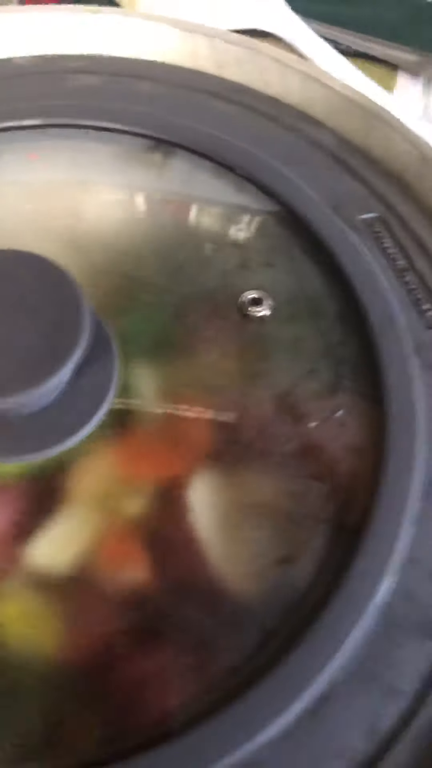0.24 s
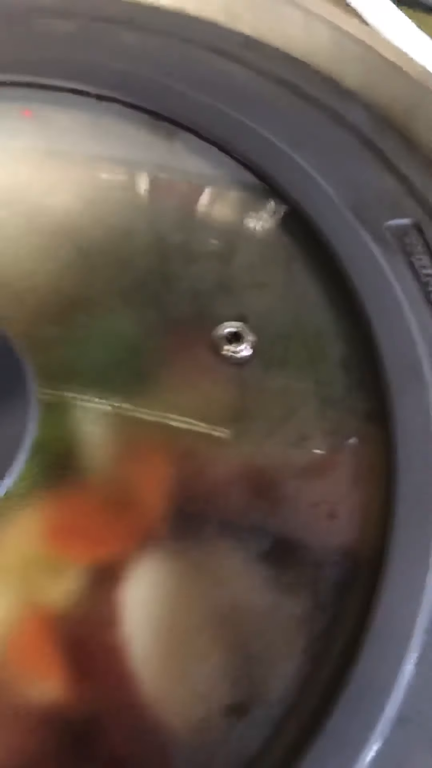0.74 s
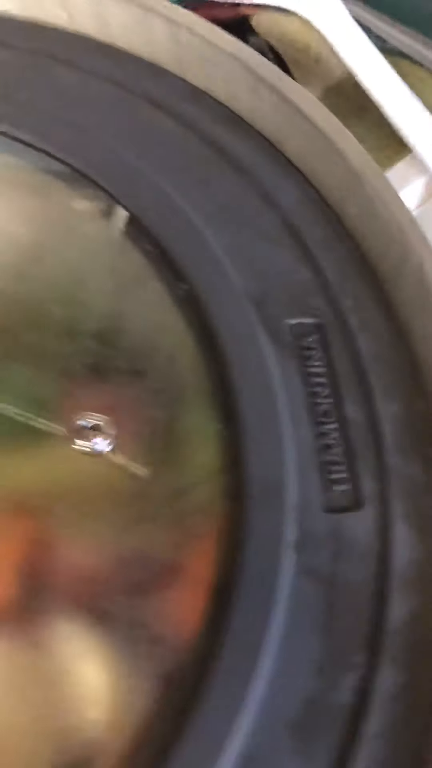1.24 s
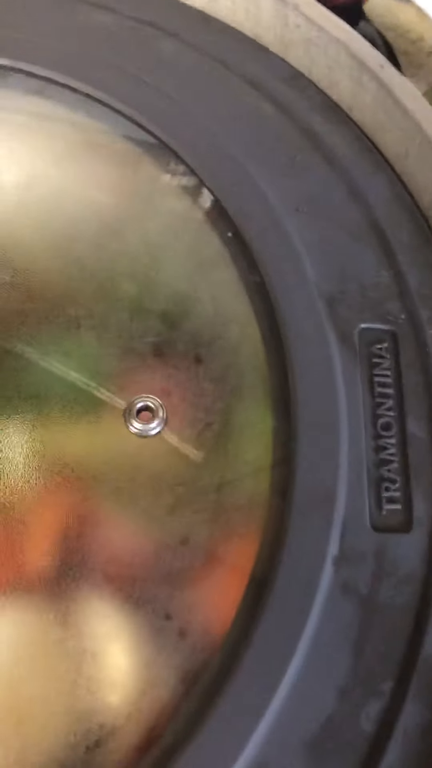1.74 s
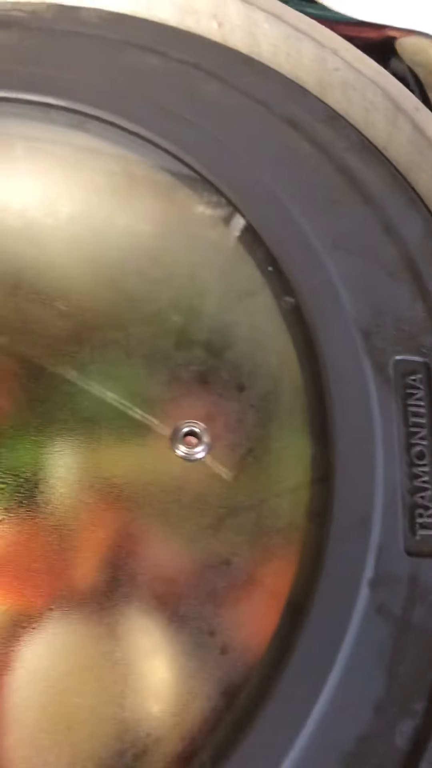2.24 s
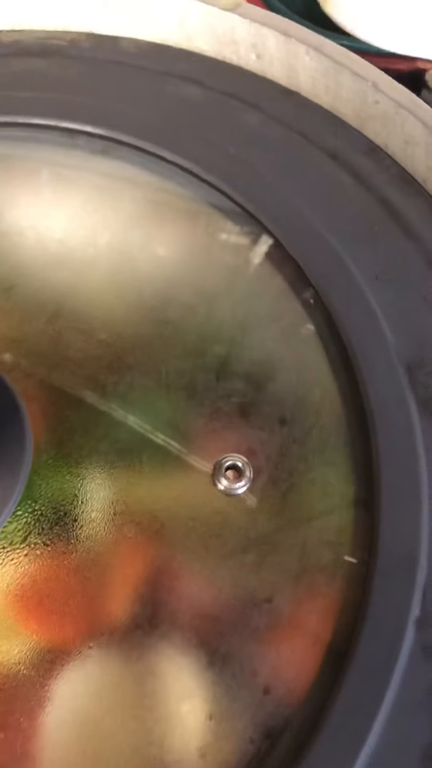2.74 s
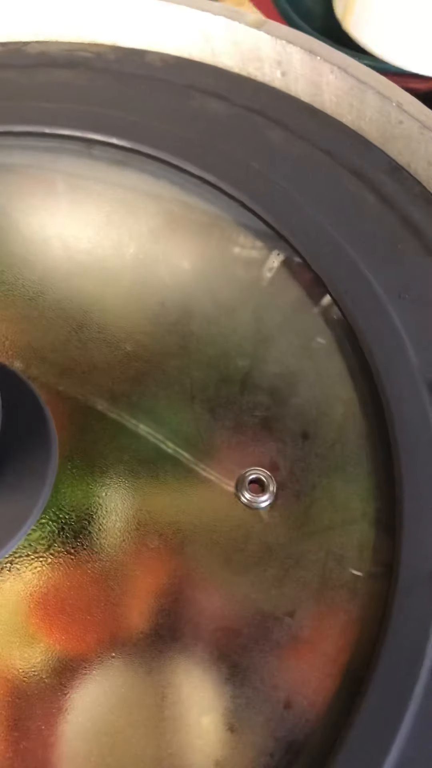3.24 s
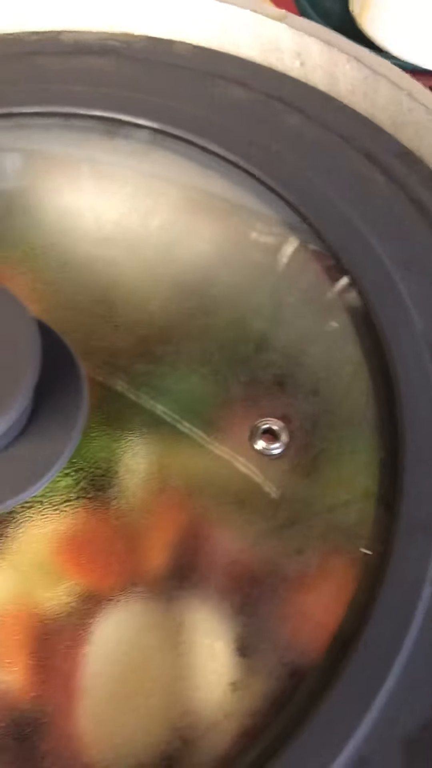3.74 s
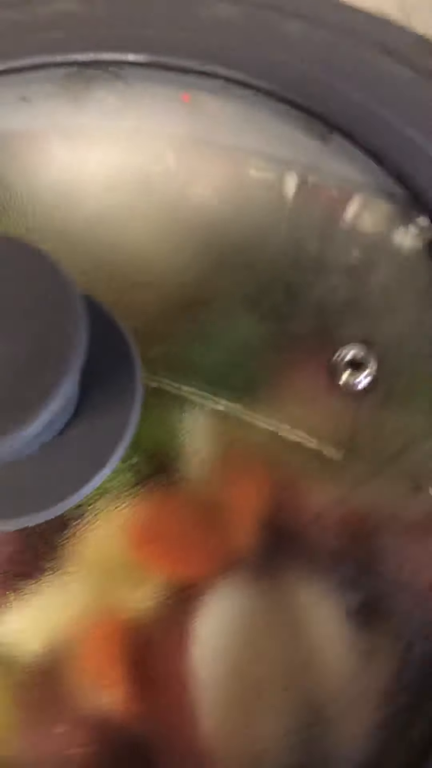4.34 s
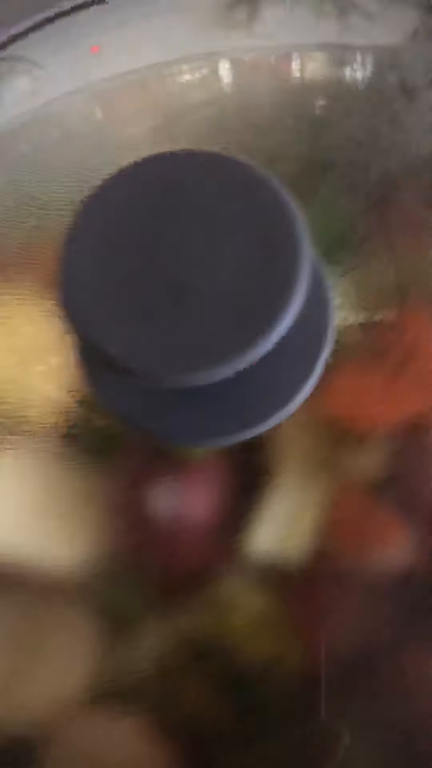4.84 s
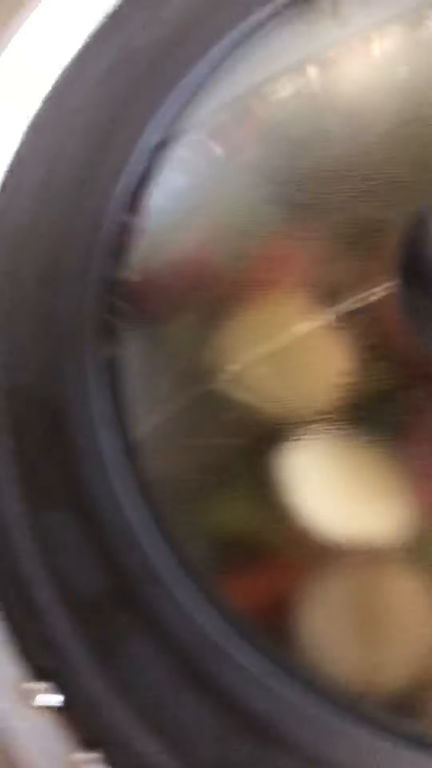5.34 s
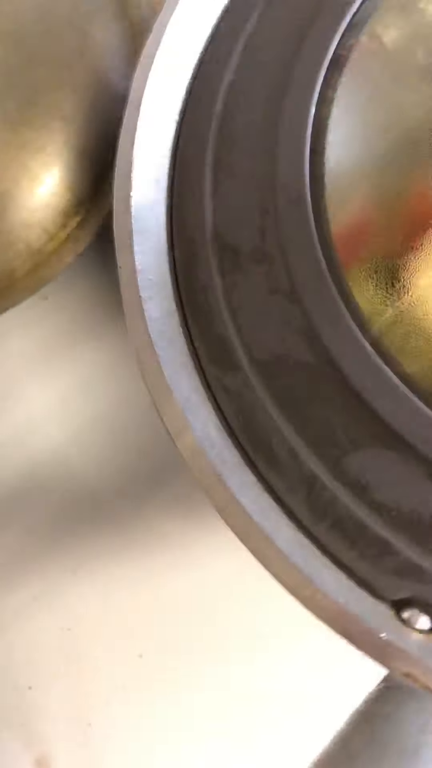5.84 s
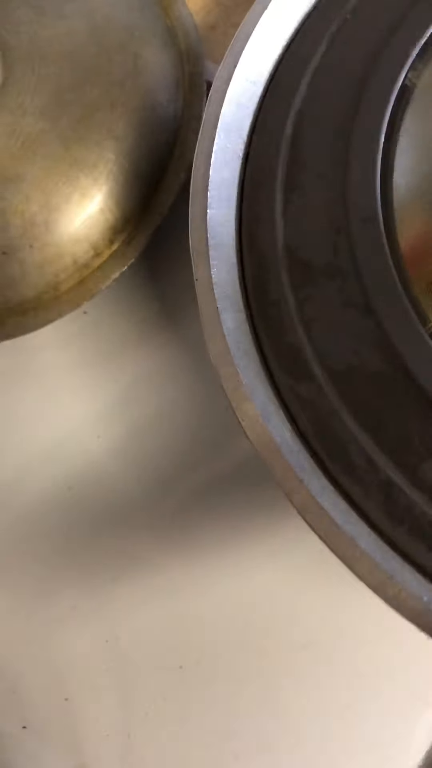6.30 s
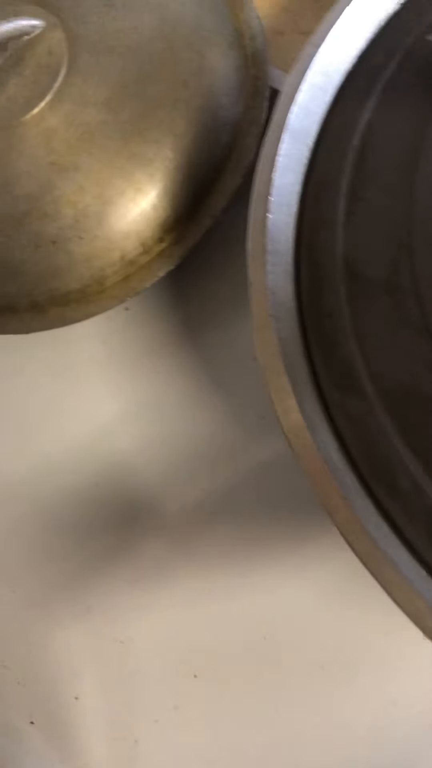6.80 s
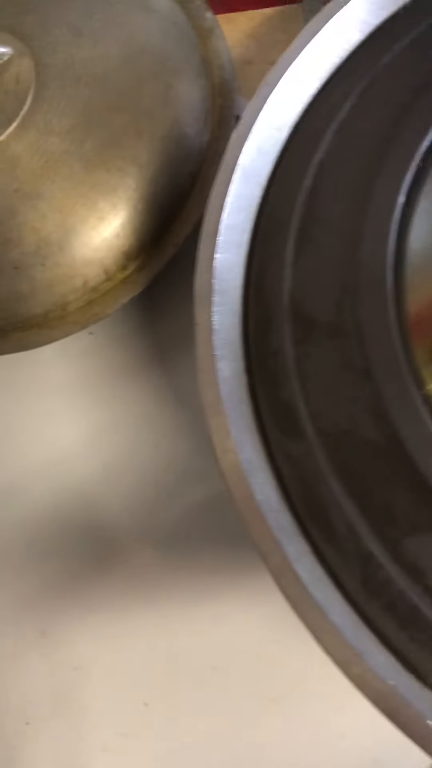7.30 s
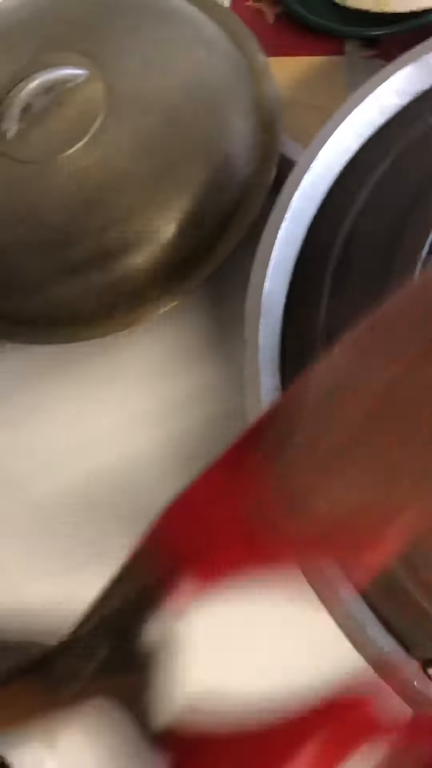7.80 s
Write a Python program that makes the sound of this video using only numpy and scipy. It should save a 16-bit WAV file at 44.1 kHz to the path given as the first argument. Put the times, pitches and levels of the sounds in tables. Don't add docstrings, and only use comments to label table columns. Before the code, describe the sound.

Dense, fine sizzle and steam hiss fill the foreground over a faint low flame rumble. Footfall-like bumps, muffled wood knocks, a scrape and light pot taps come irregularly nearby. A single hard clack jumps out just before halfway, ringing briefly in the small room. Afterwards there are a few tiny sharp spits and a couple more bumps, then the hiss thins and softens beside the pot, with its treble briefly shaded at the end.

```python
import sys
import numpy as np
from scipy import signal
from scipy.fft import rfft, irfft
from scipy.io import wavfile

SR = 44100
rng = np.random.default_rng(int(sys.argv[2]) if len(sys.argv) > 2 else 0)


def nominal_scale(level):
    x = np.asarray(level, float) / 20
    return 10 ** x


def persist_wave(psi):
    counts = np.round(np.clip(psi, -1, 1) * 32767).astype(np.int16)
    wavfile.write(sys.argv[1], SR, np.atleast_2d(counts).T)


N = 355446
T = np.arange(N) / SR
FFT_SIZE = 360000
HZ = np.maximum(np.fft.rfftfreq(FFT_SIZE, 1 / SR), 1)


def rms_one(x):
    return x / np.sqrt(np.mean(x ** 2) + 1e-20)


def noise_spectrum():
    return rfft(rng.standard_normal(N), FFT_SIZE)


def at_hz(points, hz):
    table_hz, values = np.transpose(points)
    return np.interp(np.log(hz), np.log(table_hz), values)


def drift(rate_hz):
    hop = 40
    pole = np.exp(-2 * hop * np.pi * rate_hz / SR)
    chance = rng.standard_normal(N // hop + 2002)
    slow = signal.lfilter([1], [1, -2 * pole, pole ** 2], chance)[2000:]
    return np.interp(np.arange(N) / hop, np.arange(len(slow)), rms_one(slow))


def ring(clicks, hz, t60):
    pole = nominal_scale(-60 / (max(t60, .001) * SR))
    angle = 2 * np.pi * hz / SR
    return signal.lfilter([0, np.sin(angle)], [1, -2 * pole * np.cos(angle), pole ** 2], clicks + 1e-18)


def add(track, s, sound):
    i = round(s * SR)
    track[i:i + len(sound)] += sound[:N - i]


def colour(spectrum, modes=()):
    db = at_hz(spectrum, HZ)
    for hz, width, boost in modes:
        db = db + boost / (1 + (2 * (HZ - hz) / width) ** 2)
    return nominal_scale(db)


def band(hz, octaves):
    return np.cos(np.pi / 2 * np.clip(np.log2(HZ / hz) / octaves, -1, 1)) ** 2


def comb(echoes):
    return 1 + sum(gain * np.exp(-2j * np.pi * HZ * delay) for delay, gain in echoes)


def parts(events, shape):
    rows = []
    for s, db, hz, t60 in events:
        for ratio, part_db, longer in shape:
            rows.append((s, db + part_db, hz * ratio, t60 * longer))
    return rows


def blows(table, contact_cycles):
    out, t = np.zeros(N), T[:SR // 2]
    for s, db, hz, t60 in table:
        push = (t < contact_cycles / hz) * np.sin(np.pi * t * hz / contact_cycles)
        add(out, s, nominal_scale(db) * ring(push / push.sum(), hz, t60))
    return out


def soft_blows(rows):
    out, t = np.zeros(N), T[:SR // 2]
    rise_cycles = 0.92
    for s, db, hz, t60 in rows:
        swell = 1 - np.exp(-t * hz / rise_cycles)
        add(out, s, nominal_scale(db - 60 * t / t60) * swell * np.sin(2 * np.pi * hz * t))
    return out


def resonant_swells(rows):
    out = np.zeros(N)
    for s, length, db, hz, width_hz in rows:
        t = T[T < length]
        t60 = np.log(1000) / (np.pi * 1.5 * width_hz)
        once = ring(rng.standard_normal(2 * SR), hz, t60)
        tone = ring(once, hz, t60)[-len(t):]
        add(out, s, nominal_scale(db) * rms_one(tone) * np.sin(np.pi * t / length))
    return out


def through_modes(spans, modes):
    return resonant_swells([(s, length, db + mode_db, hz, width)
                            for s, length, db in spans for hz, width, mode_db in modes])


# f/Hz, density level/dB
FLAME_SPECTRUM = [(35, -28), (60, -6), (82, -18), (105, -6.5), (120, -1), (150, -2), (200, -4), (290, -4.5),
                  (380, -12.5), (500, -12)]
# f/Hz, rms level/dB
HUM = [(59.2, -65)]


def burner():
    flame = noise_spectrum() * colour(FLAME_SPECTRUM) * (HZ < 500) * (HZ > 35)
    noise = rms_one(irfft(flame)[:N])
    hum = sum(np.sqrt(2) * nominal_scale(db) * np.sin(2 * np.pi * hz * T) for hz, db in HUM)
    level_db = -46.5 - 0.74 * T
    return nominal_scale(level_db + .8 * drift(6)) * noise + hum


# t/s, peak level/dB, f/Hz
THUDS = [(.485, -30.5, 139), (.87, -32.5, 118), (0.973, -30, 124), (1.03, -40, 85), (1.379, -37, 183),
         (1.46, -30.5, 119), (1.63, -34, 132), (2.258, -26.5, 113), (2.36, -27, 122), (3.56, -37, 75),
         (3.745, -35, 130), (5.01, -33, 172), (5.122, -38, 150), (5.401, -30.5, 196.5), (5.41, -39, 79),
         (5.465, -32, 141), (5.47, -36, 70)]


def thuds():
    ring_cycles = 15.7
    return soft_blows([(s, db + 3.0, hz, ring_cycles / hz) for s, db, hz in THUDS])


# t/s, peak level/dB, f/Hz, T60/s
KNOCKS = [(.43, -25, 290, 0.018), (.965, -33, 444, 0.075), (1.44, -33, 466, .04), (1.57, -42, 530, .06),
          (1.615, -37, 395, 0.087), (1.737, -18, 490, .018), (2.11, -41, 413, .06),
          (2.238, -23.5, 327, 0.056), (2.262, -33, 400, .07), (2.308, -25, 382, 0.037),
          (2.33, -35.5, 520, 0.071), (2.99, -40, 480, 0.051), (3.39, -35, 305, .022),
          (3.529, -30, 363, .041), (4.996, -29, 600, .045), (4.996, -31, 270, .05)]
# frequency ratio/1, level/dB, decay ratio/1
WOOD = [(1.013, 1, 0.84), (1.52, -8.5, .9), (.56, -9.5, 2.5)]


def knocks():
    return soft_blows(parts([(s, db + 4.0, hz, t60) for s, db, hz, t60 in KNOCKS], WOOD))


# t/s, peak level/dB, f/Hz
TAPS = [
    (1.927, -34, 890),
    (2.381, -30.5, 920),
    (3.535, -34.5, 923),
    (3.7, -37.5, 960),
]
# frequency ratio/1, level/dB, decay ratio/1
VESSEL = [(1, 1, 1), (1.07, -4, .8), (0.495, -6, .8)]


def taps():
    bounce_s, bounce_db, t60 = .016, 2.5, .045
    touches = [(s + k * bounce_s, db + k * bounce_db, hz, t60) for s, db, hz in TAPS for k in range(2)]
    return soft_blows(parts(touches, VESSEL))


# t/s, peak level/dB, f/Hz
SNAPS = [
    (1.737, -31, 2360),
    (3.39, -25, 1980),
]
# frequency ratio/1, level/dB, decay ratio/1
SNAP_MODES = [(0.95, -0.5, 1), (.71, -1, .9), (.36, -10, 1.2)]


def snaps():
    t60 = .015
    return blows(parts([(*snap, t60) for snap in SNAPS], SNAP_MODES), contact_cycles=0.24)


# t/s, length/s, level/dB
SCRAPE = (.488, .075, -40)
# f/Hz, width/Hz, level/dB
SCRAPED = [(543, 190, -4), (1480, 170, 2.5), (1950, 450, -9), (3560, 110, -4)]


def scrape():
    return through_modes([SCRAPE], SCRAPED)


# t/s, peak level/dB, f/Hz, T60/s
BANG = [(3.8615, -16, 2930, .01), (3.8628, -10.5, 6440, 0.0092), (3.8630, -6, 3800, 0.0053),
        (3.8638, -2, 2330, 0.0084), (3.8636, -4.5, 1116, 0.023), (3.8655, -1, 610, 0.017),
        (3.869, -21.5, 470, 0.18), (3.878, -9, 620, 0.033), (3.881, -9, 1250, 0.031),
        (3.887, -17, 1040, .11), (3.879, -17.5, 9400, 0.014), (3.89, -19.5, 131, 0.25),
        (3.88, -28, 92.5, 0.49), (3.98, -29, 59.3, 0.65)]


def bang():
    return blows(BANG, contact_cycles=0.47)


def splinter():
    rise_s, fall_s = .002, .0035
    age = np.maximum(T - BANG[0][0], 0)
    bright = signal.butter(1, [2500, 8000], "band", fs=SR, output="sos")
    noise = signal.sosfilt(bright, rng.standard_normal(N))
    return noise * np.minimum(age / rise_s, 1) ** 2 * np.exp(-np.maximum(age - rise_s, 0) / fall_s)


RATTLE_HZ = [500, 640, 1000, 1050, 1310, 2050, 2900]


def rattle():
    start_s, per_s, level_db, t60, ring_cycles = 3.884, 1500, -20, .22, 24.0
    out, t = np.zeros(N), T[:SR // 3]
    happens = rng.random(len(t)) < per_s / SR
    clicks = happens * rng.standard_normal(len(t)) * nominal_scale(-60 * t / t60)
    dealt = rng.integers(0, len(RATTLE_HZ), len(t))
    for k, hz in enumerate(RATTLE_HZ):
        add(out, start_s, ring(clicks * (dealt == k), hz, ring_cycles / hz))
    return nominal_scale(level_db) * out


# f/Hz, T60/s
WALL_T60 = [(100, 0.67), (400, 0.2), (1500, 0.22), (5000, 0.24), (12000, 0.13)]
# f/Hz, level/dB
WALL_COLOUR = [(40, -4), (120, -6), (600, 4.5), (1200, 6), (3000, 0), (8000, -8.5), (10500, -16.5),
               (13000, -30), (16000, -45)]


def kitchen(x):
    first_wall_s = .013
    white = noise_spectrum() * colour(WALL_COLOUR)
    t = T[:SR // 2]
    age = np.maximum(t - first_wall_s, 0)
    tail = np.zeros(len(t))
    for hz in 62 * 2. ** np.arange(9):
        tail += irfft(white * band(hz, 1))[:len(t)] * nominal_scale(-60 * age / at_hz(WALL_T60, hz))
    tail = tail * np.clip((t - first_wall_s) / .005, .4, 1)
    return signal.fftconvolve(x, tail / np.sqrt(np.sum(tail ** 2)))[:N]


# t/s, peak level/dB, f/Hz
SPITS = [
    (1.22, -22, 4620),
    (4.5494, -41, 3320),
    (4.679, -23, 3040),
    (4.89, -23, 3600),
    (6.539, -26, 5250),
    (7.5005, -25, 3850),
    (7.7156, -27, 3500),
]
# frequency ratio/1, level/dB
DROPLET = [(.8, -2.5), (1, 1.5), (1.3, -3)]


def spits():
    out, click = np.zeros(N), 1. * (np.arange(600) == 0)
    for s, db, hz in SPITS:
        for k, (ratio, part_db) in enumerate(DROPLET):
            sign = (-1) ** k
            add(out, s, sign * nominal_scale(db + part_db) * ring(click, hz * ratio, t60=0.0043))
    return out


# t/s, length/s, level/dB
LOUD_SPOTS = [
    (0, .8, -50),
    (4.4, 1.1, -49.5),
]
# f/Hz, width/Hz, level/dB
SPOT_MODES = [(790, 32, -2.5), (1540, 55, 0), (2025, 130, -1)]


def loud_spots():
    return through_modes(LOUD_SPOTS, SPOT_MODES)


# t/s, length/s, level/dB, f/Hz, width/Hz
JETS = [
    (.3, .78, -53, 9200, 1500),
    (2.7, 1, -47.5, 9800, 1700),
    (4.25, 1.1, -46.5, 8950, 900),
    (4.6, .9, -49, 5600, 500),
    (.42, .75, -51.5, 790, 55),
    (3.55, 0.023, -42, 3200, 421.2),
    (4.535, .03, -40, 4100, 500),
]


def jets():
    return resonant_swells(JETS)


def crackle():
    per_s, spread_db, ring_cycles = 5000, 3.0, 38
    pop_share, fizz_share = 0.12, 0.15
    sizes = nominal_scale(spread_db * np.minimum(rng.exponential(1, N), 4.5)) * rng.choice([-1, 1], N)
    pops = sizes * (rng.random(N) < per_s * nominal_scale(3.0 * drift(15)) / SR)
    dealt = rng.integers(0, 30, N)
    fizz = np.zeros(N)
    for k, hz in enumerate(np.geomspace(2400, 15500, 30)):
        bubbles = pops[::-1] * (dealt == k)
        fizz += np.sqrt(hz) * rms_one(ring(bubbles, hz, ring_cycles / hz))
    steam = np.sqrt(1 - pop_share - fizz_share) * rng.standard_normal(N)
    return np.sqrt(pop_share) * rms_one(pops) + np.sqrt(fizz_share) * rms_one(fizz) + steam


# t/s, sizzle level/dB, aim at the open steam level/dB
PATH = [(0.0, -38, -6.5), (0.3, -38, -8), (1.0, -37, -8), (1.9, -38.5, -7), (2.5, -37.5, -7.5),
        (3.8, -37.5, -8), (4.05, -38, -7), (4.5, -37, -6), (4.9, -38, -6), (5.25, -40, -2.5),
        (6.0, -41, 1.5), (6.4, -42, 2), (7.05, -43, 4), (7.5, -42, 3.5), (7.75, -42.5, 0), (8.06, -44.5, 0)]
MOVE_S = [5.35, 5.85]
CONTROL_HZ = [900, 3200, 8500, 13500]
AIM_SHARE = [0.22, 0.0019, 0.4, 0.9]
# t/s, length/s, level/dB
SHADE = (7.76, 0.24, -5.5)
# f/Hz, density level/dB
OVER_LID = [(180, -38), (300, -21), (600, -11), (1100, -5.5), (1500, -6.5), (2500, -5.5), (4000, -3),
            (5000, -4), (6200, -4), (7500, -6), (9300, -5.5), (12000, -9.5), (15500, -7.5)]
BESIDE_RIM = [(180, -40), (300, -20), (454, -9.5), (613, -4.5), (900, -7.5), (1400, -10.5), (2400, -7.5),
              (3500, -4.5), (5500, -4.5), (8000, -4.5), (11000, -3.5), (13000, -5), (15500, -3)]
# f/Hz, width/Hz, boost level/dB
LID_MODES = [(798, 62, 12), (1516, 57, 7.5), (1668, 42, 4), (2013, 190, 5), (2970, 116, 3),
             (4010, 190, 2.5), (636, 170, -2), (1090, 150, -8)]
RIM_MODES = [(798, 42, 9.5), (1251, 71, 14.5), (1750, 146, 9.5), (2253, 72, 9.5), (2660, 47, 7),
             (3280, 120, 5), (4540, 90, 3), (600, 120, -12.5)]
# delay/s, gain/1
LID_ECHOES = [(.00067, 0.046), (.0019, 0.064), (.0033, 0.12), (.0047, .1)]
RIM_ECHOES = [(.00203, 0.19), (.0037, 0.044), (.0052, .1)]


def sizzle():
    patchy_db, swell_db = 0.74, 0.43
    source = rfft(crackle(), FFT_SIZE)
    path_s, path_db, path_aim_db = np.transpose(PATH)
    sizzle_db, aim_db = np.interp(T, path_s, path_db), np.interp(T, path_s, path_aim_db)
    beside = np.interp(T, MOVE_S, [0, 1])
    shade_s, shade_length, shade_depth = SHADE
    shade_db = shade_depth * np.sin(np.pi * np.clip((T - shade_s) / shade_length, 0, 1))
    controls = sizzle_db + np.outer(AIM_SHARE, aim_db) + np.outer([0, 0.039, 0.63, 1], shade_db)
    middle = (HZ > 1500) & (HZ < 6000)
    together = drift(1.3)
    places = []
    for spectrum, modes, echoes, weight in ((OVER_LID, LID_MODES, LID_ECHOES, 1 - beside),
                                            (BESIDE_RIM, RIM_MODES, RIM_ECHOES, beside)):
        shape = colour(spectrum, modes) * np.abs(comb(echoes))
        shape = shape / np.sqrt(np.sum(shape[middle] ** 2) / len(HZ))
        usual = controls @ weight / weight.sum()
        places.append((shape * source, weight, usual - usual[1]))
    out = np.zeros(N)
    for hz in 280 * 2 ** (np.arange(13) / 2):
        reach = np.array([np.interp(np.log(hz), np.log(CONTROL_HZ), row) for row in np.eye(4)])
        flicker = nominal_scale(reach @ controls + swell_db * together + patchy_db * drift(7.7))
        for tone, weight, balance in places:
            out += flicker * weight * nominal_scale(-reach @ balance) * irfft(tone * band(hz, 1 / 2))[:N]
    return out


def scene():
    steady = burner() + scrape() + loud_spots() + jets() + sizzle()
    small, hit = thuds() + knocks() + taps() + snaps(), bang()
    direct = T < BANG[6][0]
    strike = 1. * (np.arange(N) == round(BANG[1][0] * SR))
    echoes = kitchen(nominal_scale(-15) * hit * direct + nominal_scale(17) * strike + nominal_scale(-16) * small)
    struck = small + spits() + hit + rattle() + echoes + nominal_scale(-10.0) * splinter()
    mic_low_cut = signal.butter(3, 70, "high", fs=SR, output="sos")
    return np.array([steady + signal.sosfilt(mic_low_cut, struck)] * 2)


def roll_off(x):
    return signal.sosfilt(signal.butter(12, 17100, fs=SR, output="sos"), x)


def record(dry):
    rounded = rfft(np.tanh(dry / 1.304) * 1.284, FFT_SIZE)
    mix = irfft(rounded * (HZ < 15750))[:, :N]
    return roll_off(mix)


dry = scene()
out = record(dry)
persist_wave(out)
```